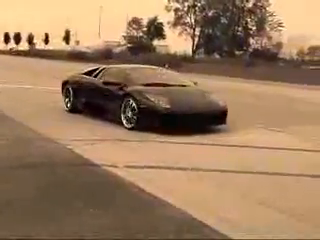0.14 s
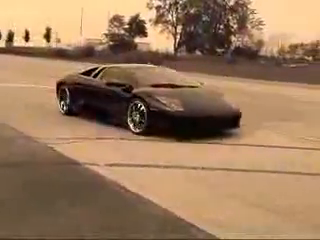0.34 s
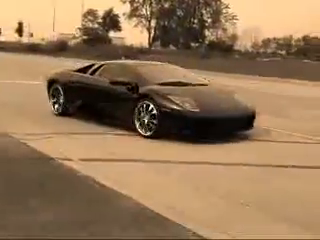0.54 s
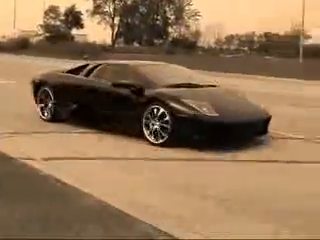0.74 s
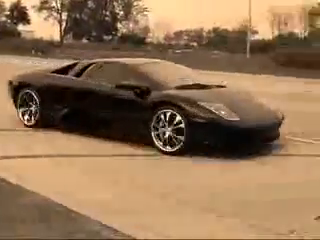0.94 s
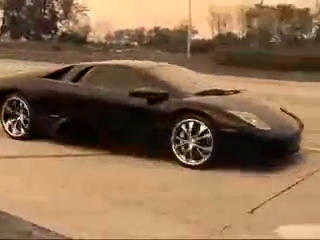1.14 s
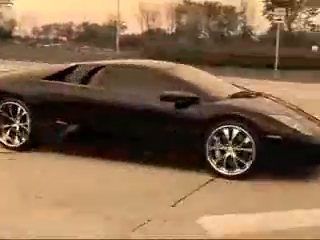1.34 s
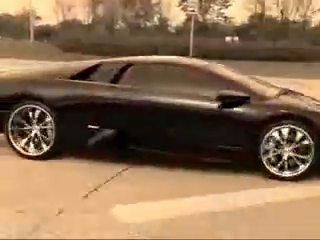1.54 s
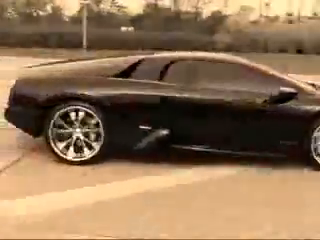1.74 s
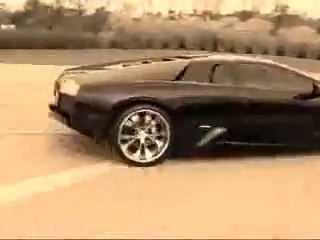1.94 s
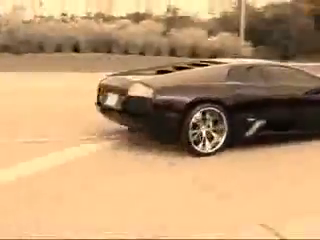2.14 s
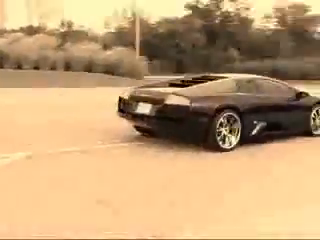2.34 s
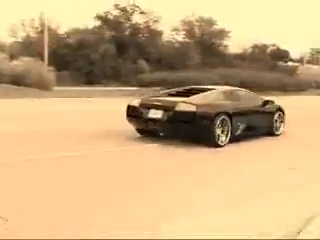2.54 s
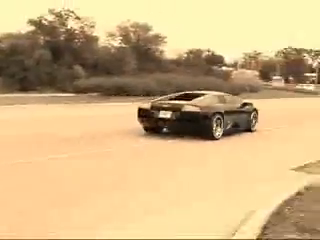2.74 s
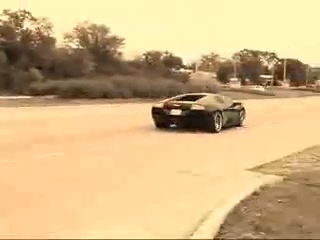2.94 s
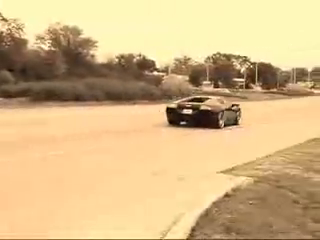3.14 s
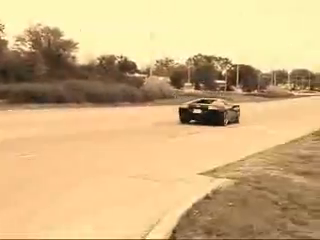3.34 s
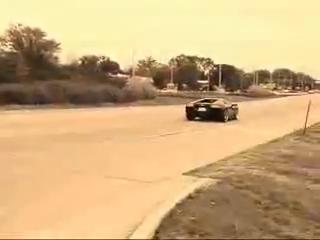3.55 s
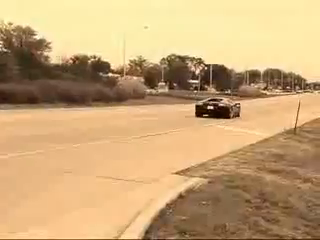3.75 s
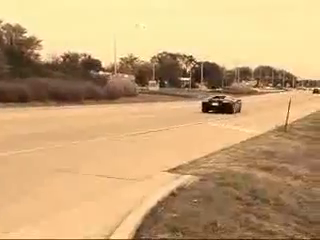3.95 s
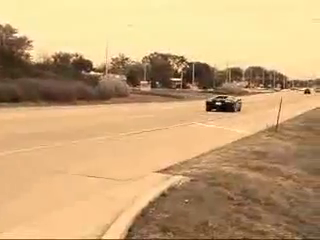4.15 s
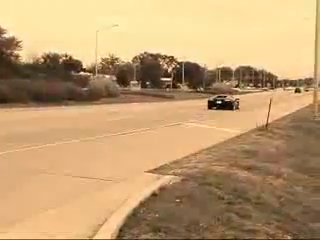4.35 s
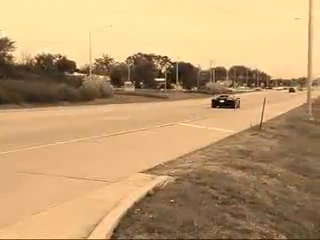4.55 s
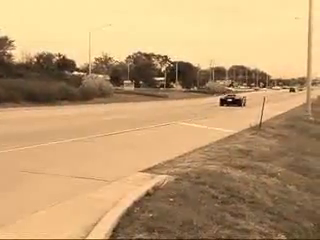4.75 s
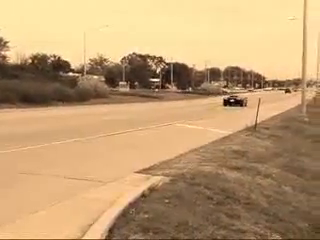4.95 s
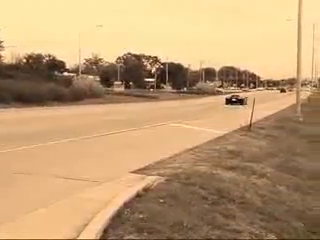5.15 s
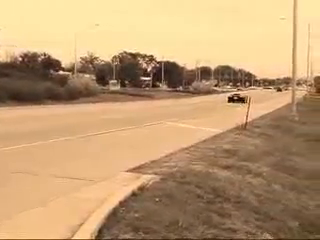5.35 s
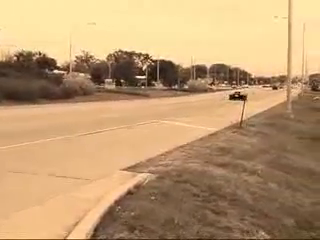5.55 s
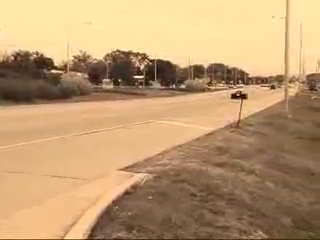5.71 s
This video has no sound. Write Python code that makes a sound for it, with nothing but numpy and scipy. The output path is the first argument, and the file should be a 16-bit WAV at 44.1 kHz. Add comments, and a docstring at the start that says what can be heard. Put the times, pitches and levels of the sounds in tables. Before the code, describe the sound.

A sports car engine revs up as it passes, drops and pops during a gear change, then climbs again into the distance.

```python
"""A low exhaust burble, close by: a sports car pulls out, passes and accelerates hard away, with one upshift.
The note climbs with the firing rate, its overtones swelling through the pipe resonances over a bark of
unequal firings. Pulsed gas adds rasp and spits; the engine bay whistles, air hisses, the road rumbles.
Off the throttle the revs sink and unburnt fuel pops in the pipes, then the next gear bites."""
import sys
import numpy as np
from scipy import signal
from scipy.fft import rfft, irfft, next_fast_len
from scipy.io import wavfile
from scipy.ndimage import uniform_filter1d, map_coordinates

SR = 44100
rng = np.random.default_rng(int(sys.argv[2]) if len(sys.argv) > 2 else 0)


def inscribe(sig):
    """Save sig as 16-bit PCM at rate SR to the path in sys.argv[1].

    A 1-D sig is mono; a 2-D sig holds one channel per row.
    Samples are clipped to [-1, 1] before scaling.
    """
    pcm = np.round(np.clip(np.atleast_2d(sig).T, -1, 1) * 32767)
    wavfile.write(sys.argv[1], SR, pcm.astype(np.int16))


N = 259308
TIME = np.arange(N) / SR

# the driver lifts for the upshift, then floors it: time_s, throttle (0-1)
THROTTLE = [(3.35, 0.96), (3.42, 0.07), (4.12, 0.1), (4.24, 1)]
# how far the tailpipes face the listener: time_s, share (0-1)
FACING = [(0, 0), (1.1, 0.14), (1.35, 0.57), (1.8, 0.64), (2.2, 0.94), (5.88, 1)]
# the car recedes, from the moment its tail comes into view: time_s, distance (0-1)
AWAY = [(2.05, 0.12), (5.88, 1)]
# fader rides for the rushing gas and air: time_s, rasp_db, hiss_db
RUSH = [(0.0, -34, -46), (0.55, -34.5, -46), (1.0, -30.5, -39.5), (1.29, -41, -47), (1.85, -38, -43.5),
        (1.95, -43, -47), (2.56, -37, -42.5), (2.7, -38, -45), (3.1, -39.5, -45.5), (3.3, -37, -43.8),
        (3.44, -40.5, -46), (4.09, -39.5, -50.5), (4.27, -36.5, -44), (4.56, -33.5, -43.5),
        (4.75, -36, -44), (5.4, -32.5, -43), (5.88, -33.5, -43.5)]


def from_db(db):
    """Decibels to gain."""
    return 10 ** (np.asarray(db) / 20)


def rms_one(x):
    """Scale to unit power."""
    return x / np.sqrt(np.mean(x ** 2) + 1e-20)


def levelled(x, size=4001):
    """Hold the short-term power at 1, so that an envelope sets the loudness."""
    return x / np.sqrt(np.maximum(uniform_filter1d(x ** 2, size), 1e-6))


def blend(a, b, share):
    """Equal-power mix with the given share of b."""
    share = np.clip(share, 0, 1)
    return np.sqrt(1 - share) * a + np.sqrt(share) * b


def in_time(rows):
    """Each column of a curve table at every sample."""
    time_s, *columns = np.transpose(rows)
    return [np.interp(TIME, time_s, column) for column in columns]


def drift(rate_hz):
    """A smooth random wander with spread 1."""
    step, warm_up = 40, 2000
    pole = np.exp(-2 * np.pi * rate_hz * step / SR)
    noise = rng.standard_normal(N // step + warm_up + 2)
    slow = signal.lfilter([1], [1, -2 * pole, pole * pole], noise)[warm_up:]
    return np.interp(np.arange(N) / step, np.arange(len(slow)), rms_one(slow))


def gain_at(colour, hz):
    """Gain of an EQ curve, which falls 40 dB per octave past its ends."""
    points_hz, db = np.transpose(colour)
    octave, known = np.log2(np.maximum(hz, 1)), np.log2(points_hz)
    outside = np.abs(octave - np.clip(octave, known[0], known[-1]))
    return from_db(np.interp(octave, known, db) - 40 * outside)


def coloured(x, colour):
    """Shape a signal with an EQ curve; unit power."""
    size = next_fast_len(N + 8192)
    hz = np.arange(size // 2 + 1) * SR / size
    return rms_one(irfft(rfft(x, size) * gain_at(colour, hz), size)[:N])


def resonance(x, hz, width_hz):
    """A two-pole band-pass with gain 1 at its peak."""
    r = np.exp(-np.pi * width_hz / SR)
    feedback = [1, -2 * r * np.cos(2 * np.pi * hz / SR), r * r]
    return signal.lfilter(np.array([1, 0, -1]) * (1 - r * r) / 2, feedback, x)


def ringing(x, modes):
    """Steep-sided resonances side by side; unit power."""
    bands = (from_db(db) * resonance(resonance(x, hz, width), hz, width) for hz, width, db in modes)
    return rms_one(sum(bands))


def reflected(x):
    """Early reflections off bodywork and road ripple the spectrum; unit power."""
    # echoes: delay_s, gain
    echoes = [(.0029, .17), (.0071, -.17), (.0133, .14), (.0217, .14)]
    return rms_one(x + sum(gain * np.interp(TIME - delay, TIME, x, left=0) for delay, gain in echoes))


def puffs(firings, depth):
    """Turbulence that surges with every firing."""
    return rms_one(rng.standard_normal(N) * np.exp(depth * np.cos(2 * np.pi * firings)))


def firing_pattern(firings, change_per_s, size=1024, count=24):
    """Each cylinder's blast has its own shape; the pattern repeats every 8 firings and slowly morphs."""
    shapes = rng.standard_normal((count, size))
    age, place = TIME * change_per_s, firings / 8 * size
    pattern = map_coordinates(shapes, [age % count, place % size], order=1, mode="grid-wrap")
    pattern /= np.hypot(age % 1, 1 - age % 1)   # even power through each morph
    # keep the differences between cylinders: what they share is in the note
    common = sum(np.interp(firings - lag, firings, pattern) for lag in (2, 4, 6)) / 3
    return rms_one(pattern - common)


def regularity(under_load=0.48, distance_blur=0.48):
    """The firing pattern holds under load, falls apart off the throttle and blurs with distance."""
    return under_load * in_time(THROTTLE)[0] * (1 - distance_blur * in_time(AWAY)[0])


def road_rumble():
    """A bed of low noise from the road and the outdoor air."""
    # rumble EQ: freq_hz, gain_db
    colour = [(20, -20.5), (45, -20), (68, -15), (95, -1.5), (125, 1.5), (250, -2), (600, -16.5)]
    # rumble swells: time_s, level_db
    ride = [(0, -32), (1.0, -26), (1.4, -29.5), (2.0, -47), (2.7, -63), (3.05, -41), (3.5, -52),
            (4.15, -34.5), (4.4, -60.5), (5.0, -63), (5.2, -40), (5.88, -40.5)]
    return from_db(in_time(ride)[0]) * coloured(rng.standard_normal(N), colour)


def whistles(bay_hz, bay_width_hz, pipe_hz, pipe_width_hz):
    """Flow sings at two steady pitches, whatever the revs."""
    # narrow whistle from the engine bay: time_s, level_db
    bay_ride = [(0, -43.5), (1.05, -38.5), (1.3, -62), (5.88, -63.5)]
    # hollow ring of the pipes: time_s, level_db
    pipe_ride = [(0, -54.5), (2.0, -45), (2.3, -38.5), (3.0, -42), (3.5, -38.5), (4.3, -46), (4.8, -37.5),
                 (5.88, -49.5)]
    bay = ringing(rng.standard_normal(N), [(bay_hz, bay_width_hz, 0)])
    pipe = ringing(rng.standard_normal(N), [(pipe_hz, pipe_width_hz, 0)])
    return from_db(in_time(bay_ride)[0]) * bay + from_db(in_time(pipe_ride)[0]) * pipe


def air_hiss(firings, jet, air_db, high_tones_db):
    """Gently pulsing hiss, topped by thin, steady tones near 8 kHz that grow louder under load."""
    # hiss EQ: freq_hz, gain_db
    colour = [(2000, -17), (2900, -8), (3150, 0.5), (3600, 1.5), (3900, -1.5), (4300, 1), (5000, -3),
              (5600, -6), (6800, -9), (8200, -10.5), (9000, -17.5), (9900, -26)]
    # thin high tones: pitch_hz, width_hz, gain_db
    high_bands = [(7450, 65, -1.5), (7800, 47, -2), (8100, 60, -3.5), (8520, 54, -3), (8880, 70, -14)]
    flow = blend(puffs(firings / 2, depth=0.13), jet, 0.29)
    air = from_db(air_db) * reflected(coloured(flow, colour))
    tones_gain = from_db(high_tones_db) * in_time(FACING)[0] * regularity()
    high_tones = tones_gain * ringing(rng.standard_normal(N), high_bands)
    return from_db(in_time(RUSH)[1] + 0.5 * drift(14)) * (air + high_tones)


def gas_jet(firings, depth, change_per_s, pattern_share):
    """Gas leaving the pipes: turbulent puffs mixed with the repeating firing pattern."""
    return blend(puffs(firings, depth), firing_pattern(firings, change_per_s), pattern_share)


def gas_rasp(firings, jet, front_db, rear_db):
    """Engine bay noise crossfades to pulsed tailpipe rasp as the car passes."""
    # rasp EQ from ahead: freq_hz, gain_db
    front_colour = [(800, -21.5), (1020, -2), (1130, -2.5), (1260, -3.5), (1700, -8), (2350, -7.5),
                    (2600, -17), (2900, -17.5)]
    # rasp EQ from behind: freq_hz, gain_db
    rear_colour = [(850, -30.5), (1080, 0), (1200, -1.5), (1400, -3), (1750, -3), (1960, -8.5), (2130, -2),
                   (2380, -5.5), (2600, -4.5), (2850, -24)]
    front = from_db(front_db) * reflected(coloured(puffs(firings, depth=0.21), front_colour))
    rear = from_db(rear_db) * reflected(coloured(jet, rear_colour))
    return from_db(in_time(RUSH)[0] + 0.83 * drift(23)) * blend(front, rear, in_time(FACING)[0])


def buzz(firings):
    """The sharp edges of the firings: high half-multiples of the note, each flickering; unit power."""
    return rms_one(sum((1 + 0.5 * drift(10)) * np.sin(2 * np.pi * (k / 2 * firings + rng.random()))
                       for k in range(7, 19)))


def tailpipe_ring(firings, jet, trim_db, buzziness, beam_s, beam_width_s, beam_db):
    """Jet and buzz ring the tailpipes, hardest while they point straight at the listener."""
    # tailpipe modes: pitch_hz, width_hz, gain_db
    modes = [(1266, 110, -7.5), (1470, 330, -4.5), (1890, 170, 3), (1970, 120, 6.5), (2303, 300, -6),
             (3685, 170, -13.5), (4266, 140, -5.5), (4600, 510, -16)]
    swell_db = beam_db * np.exp(-0.5 * ((TIME - beam_s) / beam_width_s) ** 2)
    gain = in_time(FACING)[0] * from_db(in_time(RUSH)[0] + trim_db + swell_db + 1.3 * drift(22))
    buzz_share = buzziness * (1 - in_time(AWAY)[0])
    return gain * blend(ringing(jet, modes), ringing(buzz(firings), modes), buzz_share)


def jet_flare(firings):
    """The bright beam of the gas jet, ragged from firing to firing."""
    # flare swells: time_s, level_db
    ride = [(0, -72.5), (2.1, -59), (2.22, -34.5), (2.55, -39), (2.75, -63), (4.1, -57), (4.23, -41.5),
            (4.57, -49.5), (4.8, -49.5), (5.4, -36.5), (5.88, -40)]
    # flare EQ: freq_hz, gain_db
    colour = [(800, -27.5), (980, -0.5), (1110, -4), (1300, 4.5), (1550, 1.5), (1750, -15), (2900, -26),
              (4200, -17.5), (4900, -13.5), (5600, -20), (6500, -34.5)]
    jet = gas_jet(firings, depth=0.46, change_per_s=5.0, pattern_share=0.082)
    return from_db(in_time(ride)[0] + drift(16)) * coloured(jet, colour)


def spits(trim_db, decay_s, pitch_hz, width_hz):
    """Brief bursts of gas through the tailpipes' bright resonance."""
    # spits under full load: start_s, level_db
    cues = [(2.3108, -13.5), (2.3545, -29), (2.4391, -17.5)]
    envelope = sum(from_db(db) * (TIME > s) * np.exp(-np.abs(TIME - s) / decay_s) for s, db in cues)
    return from_db(trim_db) * envelope * ringing(rng.standard_normal(N), [(pitch_hz, width_hz, 0)])


def overrun_pops(crack_db, crack_s):
    """Unburnt fuel goes off in the pipes: a short ring and a puff of gas, with no deep bass."""
    # pops off the throttle: start_s, gain_db
    cues = [(3.907, -17.5), (3.921, -20), (3.983, -21.5), (4.021, -20), (4.026, -15.5), (4.036, -22)]
    # pipe modes struck by a pop: pitch_hz, gain_db, t60_s
    modes = [(169.2, -6, 0.029), (280, 8.5, 0.028), (440, -8, 0.026), (720, -30, .015)]
    out, age = np.zeros(N), TIME[:SR // 10]
    ring = sum(from_db(db - 60 * age / t60) * np.sin(2 * np.pi * hz * age) for hz, db, t60 in modes)
    for start_s, gain_db in cues:
        gas = rms_one(resonance(rng.standard_normal(len(age)), hz=600, width_hz=350))
        crack = from_db(crack_db) * gas * np.exp(-age / crack_s)
        out[int(start_s * SR):][:len(age)] += from_db(gain_db) * (ring + crack)
    return signal.sosfilt(signal.butter(4, [130, 1000], "band", fs=SR, output="sos"), out)


def exhaust_burble(firings, burble_trim_db, bark_trim_db):
    """Unequal firings put weak tones between the harmonics; off the throttle they turn to ragged noise."""
    # fader rides for the uneven firing: time_s, burble_db, bark_db
    rides = [(0.0, -33, -35), (1.05, -25.5, -31), (1.37, -37, -36), (1.6, -21, -31.5), (2.03, -31, -39.5),
             (2.3, -24.5, -27), (2.56, -27, -32), (2.64, -29.5, -32), (3.3, -29, -28.5),
             (3.44, -33.5, -33.5), (3.62, -24.5, -35), (4.09, -29.5, -41), (4.17, -18, -29),
             (4.3, -26.5, -25.5), (4.8, -28, -29), (5.58, -31.5, -23.5), (5.88, -29, -27.5)]
    # low burble EQ: freq_hz, gain_db
    burble_colour = [(50, -30.5), (85, -21.5), (135, -4.5), (175, 1), (228, 6), (275, -5), (330, 6.5),
                     (420, -9.5), (520, -17), (700, -37)]
    # midrange bark EQ: freq_hz, gain_db
    bark_colour = [(300, -27.5), (420, 2.5), (490, 0.5), (580, -5.5), (670, 4), (820, -6), (920, -7.5),
                   (1050, -18), (1300, -30.5)]
    # plain roar from ahead, where the body hides the pipes: freq_hz, gain_db
    roar_colour = [(300, -26.5), (430, 1), (520, -1.5), (600, 0.5), (700, 1), (860, -0.5), (1000, -5.5),
                   (1300, -32)]
    burble_db, bark_db = in_time(rides)
    gas, pattern = puffs(firings, depth=0.61), firing_pattern(firings, change_per_s=3.0)
    burble = levelled(coloured(blend(gas, pattern, regularity() + 0.18), burble_colour))
    front = coloured(rng.standard_normal(N), roar_colour)
    rear = coloured(blend(gas, pattern, regularity()), bark_colour)
    bark = levelled(blend(front, rear, in_time(FACING)[0]))
    return from_db(burble_db + burble_trim_db) * burble + from_db(bark_db + bark_trim_db) * bark


def exhaust_orders(firings, firing_hz, trim_db, flutter_db, fading_db, coast_loss_db, turn_s):
    """Overtones and a sub-octave follow the load and swell as each crosses a pipe resonance."""
    # pitch of each order: multiple of the firing rate
    multiples = (.5, 1.5, 2, 2.5, 3)
    # strength of each order at the engine: gain_db
    strengths = [-3.5, 0, 4.5, -2.0, -0.8]
    # fader ride for all orders: time_s, level_db
    ride = [(0.0, -22), (0.55, -20), (0.68, -23), (0.85, -20), (1.85, -16), (2.1, -15), (2.6, -11.5),
            (2.8, -19), (3.33, -13), (4.2, -10), (4.8, -12), (5.25, -18.5), (5.88, -19.5)]
    # pipe resonances from ahead: freq_hz, gain_db
    pipes_ahead = [(80.0, -41), (105.0, -15.5), (165.0, -3.5), (192.0, -7), (215.0, 1), (240.0, -12.5),
                   (285.0, -11.5), (328.0, -4), (370.0, -17), (440.0, -30), (510.0, -27), (600.0, -17.5),
                   (720.0, -23.5)]
    # pipe resonances from behind: freq_hz, gain_db
    pipes_behind = [(130.0, -15), (148.0, -15), (160.0, -15.5), (205.0, -11.5), (400.0, -17.5),
                    (450.0, -18), (475.0, -12), (535.0, -13.5), (570.0, -14.8), (598.0, -23.5),
                    (630.0, -16), (670.0, -15.5), (700.0, -14), (725.0, -14.5), (768.0, -23.5),
                    (805.0, -22), (850.0, -25.5), (900.0, -16.5), (980.0, -32.5), (1150.0, -34.5)]
    # one order briefly howls up or drops out: centre_s, multiple, half_length_s, change_db
    howls = [(0.658, 2, 0.036, -17), (1.294, 3, 0.14, 8.5), (1.331, 2, .1, 3.5), (1.93, 2, 0.14, -7),
             (2.386, 2.5, 0.035, 7), (2.5, 1.5, 0.12, -18), (2.5, .5, .13, -13), (2.65, 2, 0.15, 3),
             (2.838, 2, .04, -14), (2.995, 2, .1, 3), (3.02, 2.5, .16, -23), (3.18, 2, 0.037, -5),
             (4.288, 2, 0.15, -7), (4.567, 2, 0.044, 5), (4.68, 2, 0.058, -9.5), (4.768, 2.5, 0.059, 6.5),
             (4.953, 2, 0.051, 5), (5.23, 2, .05, 4), (5.335, 2, .04, -16), (5.43, 2.5, .05, 8)]
    drive_db = in_time(ride)[0] + trim_db - coast_loss_db * (1 - in_time(THROTTLE)[0])
    behind = np.clip((TIME - AWAY[0][0]) / turn_s, 0, 1)   # the pipes swing round to the listener
    out = np.zeros(N)
    for multiple, strength_db in zip(multiples, strengths):
        hz = multiple * firing_hz
        pipes = gain_at(pipes_ahead, hz) ** (1 - behind) * gain_at(pipes_behind, hz) ** behind
        howl_db = sum(db * np.exp(-((TIME - s) / half_s) ** 2)
                      for s, which, half_s, db in howls if which == multiple)
        waver_db = flutter_db * drift(14) + fading_db * drift(5)
        tone = np.sin(2 * np.pi * (multiple * firings + rng.random()))
        out += from_db(drive_db + strength_db + howl_db + waver_db) * pipes * tone
    return np.sqrt(2) * out


def exhaust_note(firings, trim_db, flutter_db, throb_db, throb_hz, crest_s):
    """A clean tone at the firing rate; it flutters slightly, and throbs once the car is far away."""
    # fader ride for the note: time_s, level_db
    ride = [(0, -22.5), (0.45, -20.5), (0.55, -19), (0.68, -19.5), (0.88, -17), (1.47, -14), (1.82, -14.5),
            (1.92, -12.5), (2.6, -12), (2.92, -18.6), (3.34, -16), (3.43, -30), (3.5, -21), (3.86, -31),
            (4.02, -29.5), (4.11, -37.5), (4.17, -14), (4.24, -12.5), (4.38, -15.5), (4.82, -13),
            (5.15, -16), (5.88, -16.5)]
    far = in_time(AWAY)[0] ** 10   # the steep power holds the throb back until the end
    throb = far * np.cos(2 * np.pi * throb_hz * (TIME - crest_s))
    level_db = in_time(ride)[0] + trim_db + throb_db * throb + flutter_db * drift(24)
    return np.sqrt(2) * from_db(level_db) * np.sin(2 * np.pi * firings)


def scene():
    """One running count of firings locks the engine layers together; whistles, bursts and road run free."""
    # engine speed as the firing rate, the pitch of the exhaust note: time_s, firing_hz
    revs = [(0.0, 130), (0.2, 127.4), (0.46, 98.5), (0.62, 115.5), (0.72, 115.4), (1.38, 164.8),
            (2.19, 260.5), (2.28, 277.2), (2.47, 291), (2.62, 319), (2.75, 334), (2.89, 355.7), (3.33, 409),
            (3.4, 397.4), (3.59, 404), (3.93, 285), (4.06, 276.8), (4.19, 309.7), (4.29, 307.4),
            (4.36, 294), (4.5, 310.8), (4.56, 311.3), (5.22, 355.4), (5.88, 390.8)]
    firing_hz = in_time(revs)[0]
    jitter = 0.0015 * (drift(12) + drift(50))
    firings = np.cumsum(firing_hz * (1 + jitter)) / SR
    note = exhaust_note(firings, trim_db=-0.12, flutter_db=0.6, throb_db=6, throb_hz=6.9, crest_s=5.67)
    orders = exhaust_orders(firings, firing_hz, trim_db=1.13, flutter_db=1.58, fading_db=1.6,
                            coast_loss_db=25, turn_s=0.29)
    burble = exhaust_burble(firings, burble_trim_db=-2.0, bark_trim_db=-0.43)
    jet = gas_jet(firings, depth=0.28, change_per_s=3.003, pattern_share=0.49 * regularity())
    rasp = gas_rasp(firings, jet, front_db=-1.0, rear_db=-2.0)
    ring = tailpipe_ring(firings, jet, trim_db=-11.5, buzziness=0.23,
                         beam_s=2.6, beam_width_s=0.33, beam_db=13)
    hiss = air_hiss(firings, jet, air_db=-0.5, high_tones_db=-7.0)
    flare = jet_flare(firings)
    singing = whistles(bay_hz=1134, bay_width_hz=31, pipe_hz=819, pipe_width_hz=35)
    bursts = overrun_pops(crack_db=-13, crack_s=0.0068)
    bursts += spits(trim_db=-10.5, decay_s=0.005, pitch_hz=1870, width_hz=430)
    return (road_rumble() + singing + hiss + rasp + ring + flare + bursts + burble + orders + note)[None]


def record(dry, cutoff_hz=9900):
    """A small microphone with a steeply closed top end."""
    return signal.sosfilt(signal.ellip(12, 0.1, 90, cutoff_hz, fs=SR, output="sos"), dry)


dry = scene()
out = record(dry)
inscribe(out)
```